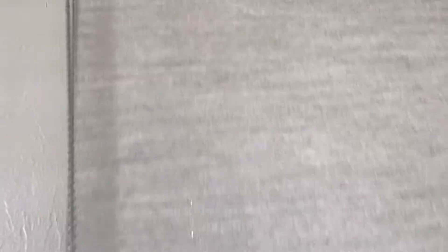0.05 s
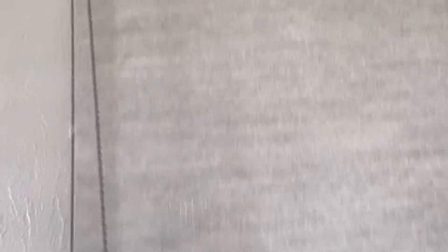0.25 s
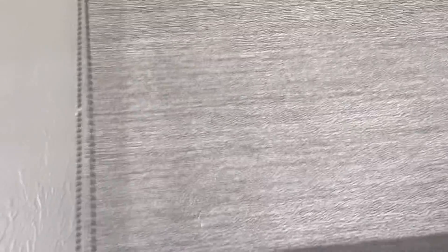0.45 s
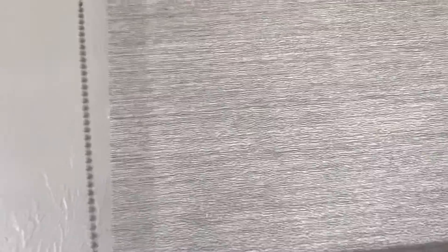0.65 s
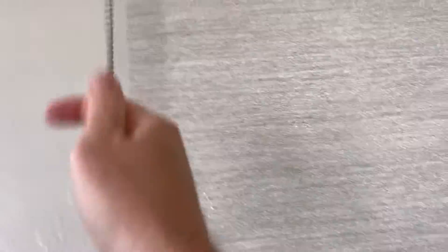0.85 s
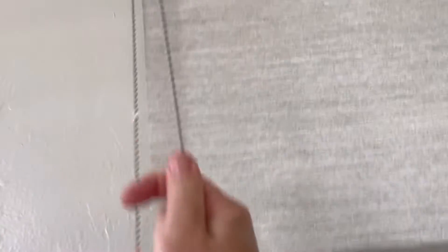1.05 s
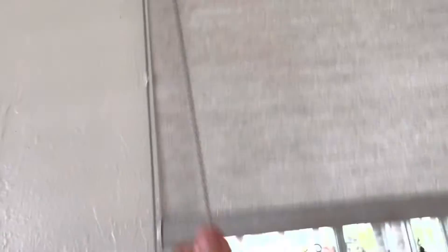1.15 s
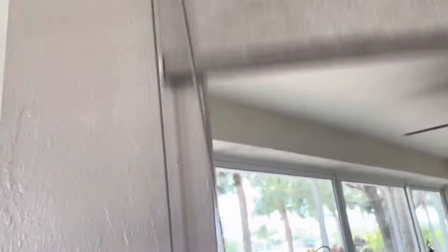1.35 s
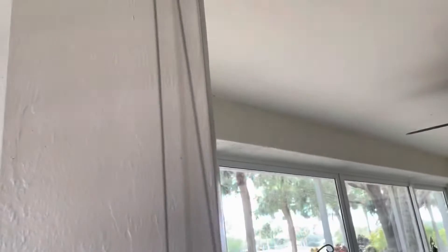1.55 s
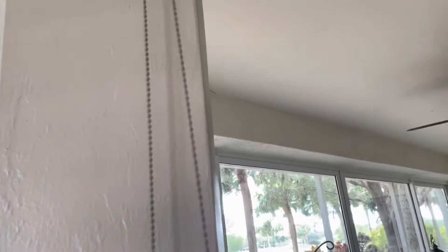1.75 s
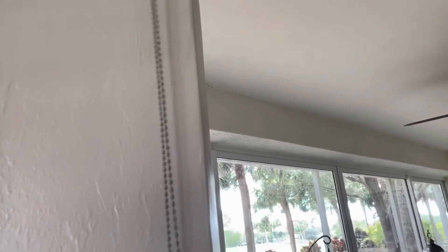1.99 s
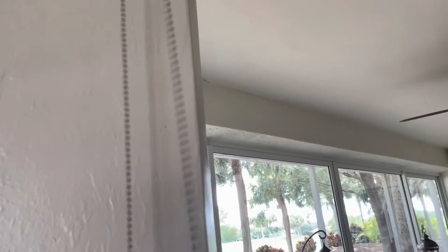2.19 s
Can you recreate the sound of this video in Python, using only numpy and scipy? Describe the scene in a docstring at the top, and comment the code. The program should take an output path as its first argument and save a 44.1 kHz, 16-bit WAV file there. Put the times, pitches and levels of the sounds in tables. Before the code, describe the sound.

A bead chain rattles as a roller shade is pulled up in two pulls.

```python
"""A bead chain rattles in two pulls, raising a fabric roller shade close by in a living room.
The beads tick through the clutch, the casing drones and the roller rubs once a turn.
Between the pulls the cloth sways and the slack chain clinks.
At the end the bottom bar knocks against the frame and taps a metal fitting."""
import sys
import numpy as np
from scipy import signal
from scipy.fft import rfft, irfft, next_fast_len
from scipy.io import wavfile
from scipy.ndimage import uniform_filter1d

SR = 44100
rng = np.random.default_rng(int(sys.argv[2]) if len(sys.argv) > 2 else 0)


def persist_wave(psi):
    """Save psi, clipped to +-1, as 16-bit WAV."""
    counts = np.round(np.clip(psi, -1, 1) * 32767).astype(np.int16)
    wavfile.write(sys.argv[1], SR, np.atleast_2d(counts).T)


N = 97990
T = np.arange(N) / SR
FFT_SIZE = next_fast_len(N + SR)
HZ = np.maximum(np.arange(FFT_SIZE // 2 + 1) * SR / FFT_SIZE, 1)


def from_db(db):
    """Decibels to gain."""
    return 10 ** (np.asarray(db) / 20)


def unit_rms(x):
    """Scale to rms 1."""
    return x / np.sqrt(np.mean(x ** 2) + 1e-20)


def over_time(rows):
    """(time [s], value) rows interpolated at every sample."""
    return np.interp(T, *np.transpose(rows))


def over_hz(rows):
    """(frequency [Hz], value) rows interpolated at every bin, in log frequency."""
    hz, value = np.transpose(rows)
    return np.interp(np.log(HZ), np.log(hz), value)


def colour(x, spectrum):
    """Minimum-phase filter from (frequency [Hz], gain [dB]) rows."""
    cepstrum = irfft(np.log(from_db(over_hz(spectrum))), FFT_SIZE)
    cepstrum[1:FFT_SIZE // 2] *= 2
    cepstrum[FFT_SIZE // 2 + 1:] = 0
    return irfft(rfft(x, FFT_SIZE) * np.exp(rfft(cepstrum)), FFT_SIZE)[:N]


def resonance(x, hz, width_hz):
    """Two-pole band-pass, peak gain 1."""
    r, w = np.exp(-np.pi * width_hz / SR), 2 * np.pi * hz / SR
    return signal.lfilter(np.array([1, 0, -1]) * (1 - r * r) / 2, [1, -2 * r * np.cos(w), r * r], x)


def body(x, rows):
    """Parallel resonances, signs alternating."""
    return sum((-1) ** k * from_db(db) * resonance(x, hz, width_hz)
               for k, (hz, width_hz, db) in enumerate(rows))


def modes(strikes, rows):
    """Each strike rings every mode as a decaying sine."""
    out = 0
    for k, (hz, db, t60_s) in enumerate(rows):
        r, w = from_db(-60 / (t60_s * SR)), 2 * np.pi * hz / SR
        ring = signal.lfilter([0, np.sin(w)], [1, -2 * r * np.cos(w), r * r], strikes + 1e-18)
        out += (-1) ** k * from_db(db) * ring
    return out


def click(start_s):
    """Unit impulse."""
    return 1. * (np.arange(N) == int(start_s * SR))


def decay(start_s, fall_s):
    """Envelope: jump to 1, exponential fall."""
    return (T >= start_s) * np.exp(-np.clip((T - start_s) / fall_s, 0, 20))


def cushioned(start_s, rise_s, fall_s):
    """Envelope of a soft contact: short rise, exponential fall."""
    return np.clip((T - start_s) / rise_s, 0, 1) * decay(start_s, fall_s)


def wander(depth, samples):
    """Smoothed random factor around 1; depth is its rms deviation."""
    return 1 + depth * unit_rms(uniform_filter1d(rng.standard_normal(N), size=samples))


def grains(per_s=16000, spread_db=1.5):
    """Dense tiny contacts of uneven size, rms 1."""
    hits = rng.random(N) < per_s / SR
    signs = rng.choice([-1, 1], N)
    sizes = from_db(spread_db * np.minimum(rng.exponential(1, N), 3))
    return unit_rms(hits * signs * sizes)


def in_room(x, wet_db, low_t60_s=0.48, treble_t60_s=0.22):
    """Direct sound plus diffuse tail, as mid and side spectra; treble dies sooner."""
    t, noise = T[:SR], rng.standard_normal((2, SR))
    low = signal.sosfilt(signal.butter(1, 4000, fs=SR, output="sos"), noise)
    tail = low * from_db(-60 * t / low_t60_s) + (noise - low) * from_db(-60 * t / treble_t60_s)
    tail *= t > .003
    tail /= np.sqrt(np.sum(tail ** 2, axis=1, keepdims=True))
    mid_tail, side_tail = rfft(tail, FFT_SIZE)
    wet = from_db(wet_db)
    side_direct = np.minimum(HZ / 2500, 1)  # at low frequencies the side is mostly room sound
    mid = 1 + wet * mid_tail
    side = -1j * side_direct + np.sqrt(1 + wet ** 2 - side_direct ** 2) * side_tail
    return rfft(x, FFT_SIZE) * np.array([mid, side]) / np.sqrt(1 + wet ** 2)


def background(level_db=-55.5):
    """Quiet room rumble, as mid and side spectra."""
    # (frequency [Hz], gain [dB])
    room_spectrum = [(25, -18.5), (65, -3), (130, -12.5), (210, -2.5), (350, -12), (700, -29), (1500, -60),
                     (4000, -45), (16000, -69)]
    rumble = np.array([unit_rms(colour(rng.standard_normal(N), room_spectrum)) for _ in range(2)])
    return rfft(from_db(level_db) * rumble, FFT_SIZE)


def cloth(even_s=0.03):
    """The hanging cloth sways with an even, low rumble."""
    # (time [s], level [dB])
    sway_level = [(.03, -45.5), (.12, -69), (.41, -67), (.44, -43.5), (.52, -40.5), (.56, -45.5),
                  (.6, -42.5), (.69, -49.5), (.86, -61), (.92, -46), (1.02, -66), (1.4, -58), (1.66, -53),
                  (1.75, -68)]
    # (frequency [Hz], gain [dB])
    sway_spectrum = [(25, -13.5), (55, 6.5), (90, 0.5), (150, -3), (300, -7.5), (600, -21), (1200, -37.5),
                     (4000, -62)]
    rumble = colour(rng.standard_normal(N), sway_spectrum)
    running_rms = np.sqrt(np.abs(uniform_filter1d(rumble ** 2, size=int(even_s * SR))) + 1e-20)
    return from_db(over_time(sway_level)) * rumble / running_rms


def fitting():
    """The settling bar taps a metal fitting: a brief ring, its pitch differing at each touch."""
    # (time [s], level [dB], pitch [Hz])
    taps = [(1.975, -50, 1976), (2.006, -43.5, 2040), (2.15, -50, 1907), (2.157, -49.5, 1983)]
    # (frequency / pitch [ratio], gain [dB], t60 [s])
    metal_modes = [(1, 0, 0.11), (1.06, -9.5, 0.12)]
    out = 0
    for s, tap_db, hz in taps:
        tuned = [(hz * ratio, db, t60_s) for ratio, db, t60_s in metal_modes]
        out += modes(from_db(tap_db) * click(s), tuned)
    return out


def bottom_bar(thud_db=-1.5, push_db=23, ring_db=-11):
    """Knocks ring the bar and frame, each with a short thud and a low push of air."""
    # (time [s], strength [dB], low-pass cutoff [Hz])
    knocks = [(.418, -22, 910), (0.431, -17, 276), (0.889, -32, 1550), (1.770, -23.5, 1093),
              (1.898, -23, 650), (1.906, -9, 199), (1.918, -14, 815), (1.922, -13.5, 295),
              (1.980, -9.5, 182), (1.990, -18, 1200), (1.994, -14.5, 1030), (1.999, -17, 344),
              (2.012, -13.5, 500)]
    # (frequency [Hz], gain [dB], t60 [s])
    bar_modes = [(177, -20.5, 0.14), (273.6, -19, 0.51), (324, -31, 0.14), (402.6, -26.5, 0.25),
                 (504, -24, 0.27), (652, -7, 0.039), (787, -14.5, 0.16), (1016.6, -14.5, 0.08)]
    blows, thuds = 0, 0
    for s, db, cutoff_hz in knocks:
        softness = signal.butter(2, cutoff_hz, fs=SR, output="sos")
        burst = cushioned(s, rise_s=0.00093, fall_s=0.0036) * rng.standard_normal(N)
        blows += from_db(db) * signal.sosfilt(softness, click(s) + 1e-18)
        thuds += from_db(db) * signal.sosfilt(softness, burst)
    push = resonance(blows, hz=224, width_hz=316)
    ring = modes(blows, bar_modes)
    return from_db(thud_db) * thuds - from_db(push_db) * push + from_db(ring_db) * ring


def chain_clinks(gain_db=-8.5, ring_db=-16):
    """Bead hits bead, and the bar's knocks near 1.77 s and 1.91 s click too: a sharp snap, a short jangle and a
    ring scaled to the jangle."""
    # (time [s], snap [dB], jangle [dB])
    clinks = [(.058, -11, -33), (.242, -7.5, -33.5), (.4, -10, -62), (0.425, -36, -33), (.694, -76, -56.5),
              (0.776, -30, -46), (0.799, -27, -41), (.848, -23, -69), (.89, -18, -30), (1.029, -26.5, -48),
              (1.152, -12, -42), (1.232, -7.5, -26), (1.294, 3, -23.5), (1.3, -5, -27), (1.767, -30, -27.5),
              (1.909, -10.5, -25.5), (1.917, -33, -28), (2.15, -47, -39), (2.186, -18, -67)]
    # (frequency [Hz], gain [dB])
    snap_spectrum = [(300, -20), (2500, -18.5), (6000, -7.5), (10000, -9.5), (16000, -15)]
    # (frequency [Hz], gain [dB])
    jangle_spectrum = [(300, -17), (1400, -5.5), (2000, 5.5), (2700, 5), (3300, -1), (4500, -1.5),
                       (7000, -5.5), (10000, -14.5), (16000, -50)]
    # (frequency [Hz], gain [dB], t60 [s])
    chain_modes = [(1870, 0.5, 0.13), (2027, -4, 0.12), (3870, -5, 0.065), (5170, -4, 0.15),
                   (5290, -1, 0.18)]
    snap_envelope, jangle_envelope, strikes = 0, 0, 0
    for s, snap_db, jangle_db in clinks:
        snap_envelope += from_db(snap_db) * decay(s, fall_s=0.00039)
        jangle_envelope += from_db(jangle_db) * cushioned(s, rise_s=0.00085, fall_s=0.0083)
        strikes += from_db(jangle_db + ring_db) * click(s)
    snaps = colour(snap_envelope * rng.standard_normal(N), snap_spectrum)
    jangle = colour(jangle_envelope * grains(), jangle_spectrum)
    return from_db(gain_db) * (snaps + jangle + modes(strikes, chain_modes))


def roller(rub_sigma_s=0.013, rub_drone_db=-10.5, note_hz=210.9, note_db=0.5):
    """The turning roller shakes the casing; each rub swells the drone and sounds a low note."""
    # (time [s], level [dB])
    turn_rubs = [(0.168, -55), (1.05, -48), (1.328, -39), (1.379, -36), (1.461, -42), (1.52, -37.5),
                 (1.655, -35.5), (1.782, -36)]
    # (time [s], level [dB])
    drone_level = [(0, -47.5), (.08, -46.5), (.3, -46.5), (.4, -50.5), (.48, -48.5), (.6, -80), (.86, -93),
                   (.9, -48.5), (1.03, -58.5), (1.2, -45.5), (1.37, -42.5), (1.45, -43.5), (1.52, -38.5),
                   (1.68, -44.5), (1.85, -47.5), (2.22, -56.5)]
    # (frequency [Hz], width [Hz], gain [dB])
    casing_resonances = [(89, 26, -3), (210, 18.4, 5.5), (343.5, 37, -4.5), (411, 49, -1.5), (586, 45, -4),
                         (652, 14.8, 4.5), (700, 56, -1), (767.4, 12.2, 4.5), (815.5, 20, -1),
                         (891, 40, -2), (1202, 76, -9), (1686, 68, -8)]
    rubs = sum(from_db(db) * np.exp(-.5 * ((T - s) / rub_sigma_s) ** 2) for s, db in turn_rubs)
    casing = unit_rms(body(grains(), casing_resonances))
    drone = casing * (from_db(over_time(drone_level)) + from_db(rub_drone_db) * rubs)
    cycles = np.cumsum(note_hz * wander(0.027, samples=500)) / SR
    note = from_db(note_db) * rubs * np.sqrt(2) * np.sin(2 * np.pi * cycles)
    return drone, note


def running_chain(tick_fall_s=0.0029, hiss_db=-9, clutch_db=-10.5):
    """Beads tick through the resonant clutch at the speed of the pull, over a fine rattle."""
    # (time [s], level [dB])
    pull_level = [(0, -50.5), (.1, -46), (.25, -46), (.33, -56.5), (.39, -64.5), (.46, -64.5), (.55, -80),
                  (.7, -95), (.87, -74), (.9, -65.5), (1.0, -67.5), (1.11, -50.5), (1.21, -45),
                  (1.31, -38.5), (1.45, -40.5), (1.555, -38.5), (1.61, -41.5), (1.7, -40.5), (1.77, -55.5),
                  (1.85, -60.5), (1.9, -55), (1.98, -63), (2.1, -78.5)]
    # (time [s], speed [beads/s])
    pull_speed = [(0, 41), (.2, 47), (.45, 15), (.95, 12.7), (1.17, 41), (1.4, 76), (1.65, 76),
                  (1.85, 47.6), (2.1, 13.4)]
    # (frequency [Hz], width [Hz], gain [dB])
    clutch_resonances = [(4100, 150, 1.5), (4420, 170, 2), (5546, 79, 3), (6190, 59, 2)]
    # (frequency [Hz], gain [dB])
    rattle_spectrum = [(200, 1), (700, 3.5), (1300, -4), (2200, 1.5), (3200, -1.5), (4400, -1), (6000, 3),
                       (7500, 2.5), (10000, -8), (12500, -6.5), (15500, -8.5)]
    beads_per_s = over_time(pull_speed)
    beads_passed = np.cumsum(beads_per_s * wander(0.11, samples=600)) / SR
    since_bead_s = beads_passed % 1 / beads_per_s
    contacts = np.exp(-since_bead_s / tick_fall_s) * rng.standard_normal(N)
    ticks = unit_rms(resonance(contacts, hz=10700, width_hz=570) + from_db(hiss_db) * contacts)
    ticks *= from_db(-17 + 0.1038 * beads_per_s)  # faster is louder
    clutch = from_db(clutch_db) * unit_rms(body(grains(), clutch_resonances))
    rattle = unit_rms(colour(grains(), rattle_spectrum))
    return from_db(over_time(pull_level)) * (rattle + clutch + ticks)


def scene():
    """All sources in the room, mixed from mid and side to left and right."""
    # (frequency [Hz], side minus mid [dB])
    stereo_width = [(60, -17.5), (200, -18.5), (400, -10.5), (750, -1.5), (1200, -3.5), (2500, -5.5),
                    (4400, -5.5), (6000, -1.5), (7000, 7.5), (8000, 46), (9300, -1), (11000, -11),
                    (13000, -0.5), (14500, 46), (16000, 18)]
    # (frequency [Hz], left minus right [dB])
    stereo_balance = [(300, .5), (1200, -0.1), (2500, -1), (5500, -4.5), (7500, 2)]
    drone, note = roller()
    mid, side = (in_room(running_chain(), wet_db=-4)
                 + in_room(drone, wet_db=-8.5)
                 + in_room(note + cloth(), wet_db=-15)
                 + in_room(bottom_bar(), wet_db=-4.5)
                 + in_room(chain_clinks() + fitting(), wet_db=-3.5)
                 + background())
    width_rad = np.arctan(from_db(over_hz(stereo_width)))
    signs = np.array([[1], [-1]])  # left, right
    stereo = mid * np.cos(width_rad) + signs * side * np.sin(width_rad)
    balance = from_db(signs * over_hz(stereo_balance) / 2)
    return irfft(stereo * balance, FFT_SIZE)[:, :N]


def record(dry):
    """Roll off below 43 Hz, cut steeply above 16 kHz."""
    low_cut = signal.butter(3, 43, "high", fs=SR, output="sos")
    high_cut = signal.ellip(10, .2, 80, 16000, fs=SR, output="sos")
    return signal.sosfilt(high_cut, signal.sosfilt(low_cut, dry))


dry = scene()
out = record(dry)
persist_wave(out)
```